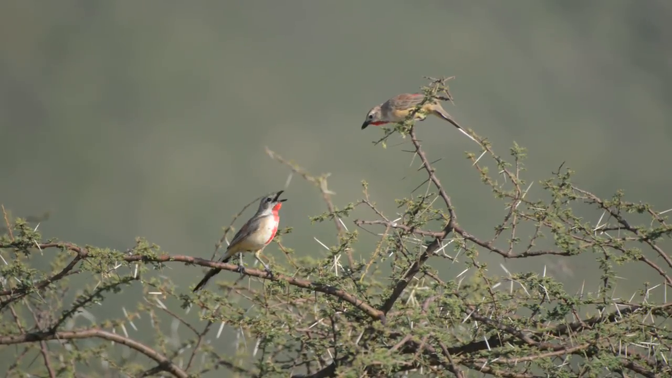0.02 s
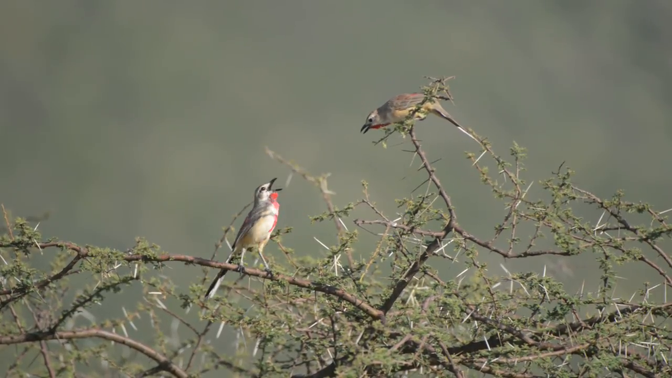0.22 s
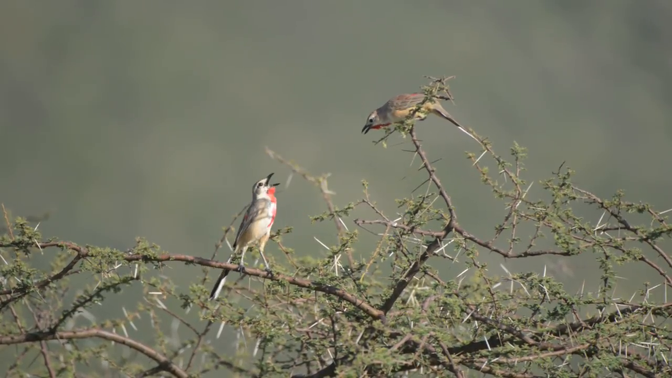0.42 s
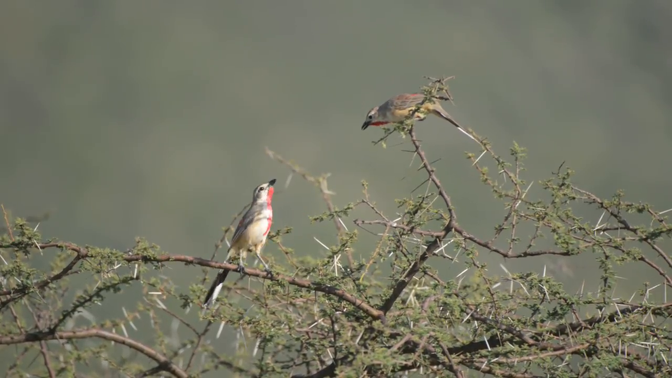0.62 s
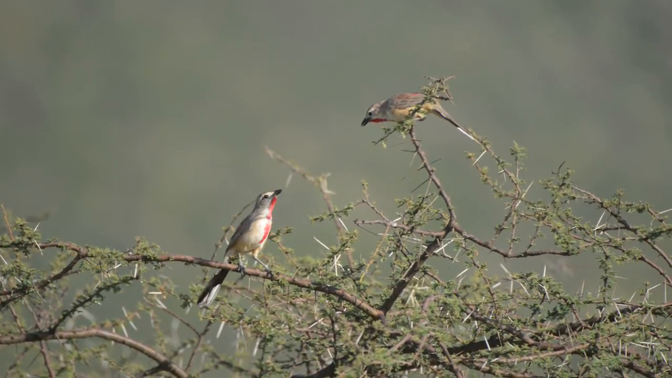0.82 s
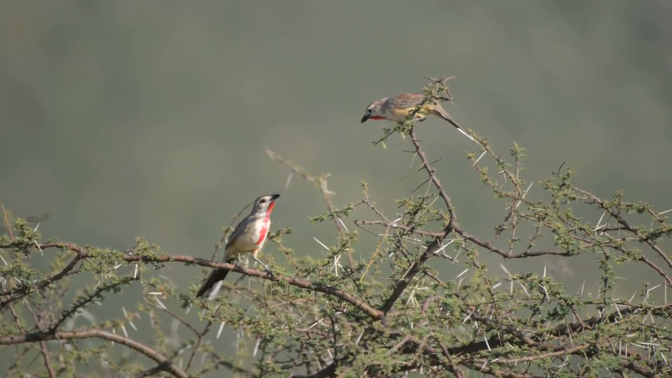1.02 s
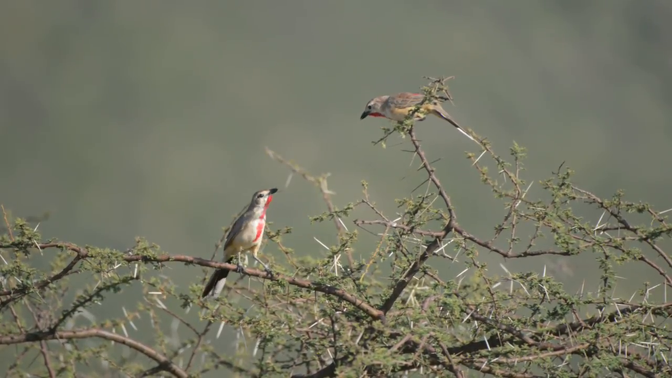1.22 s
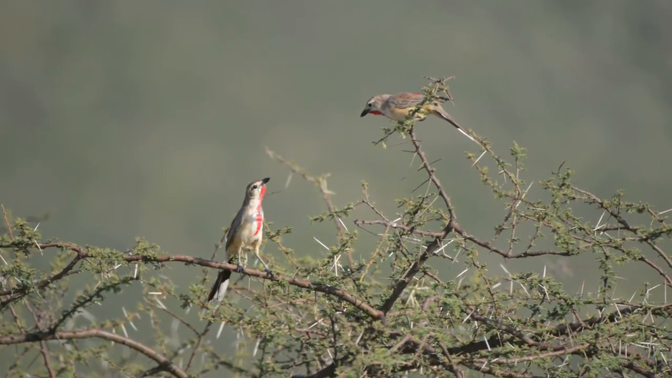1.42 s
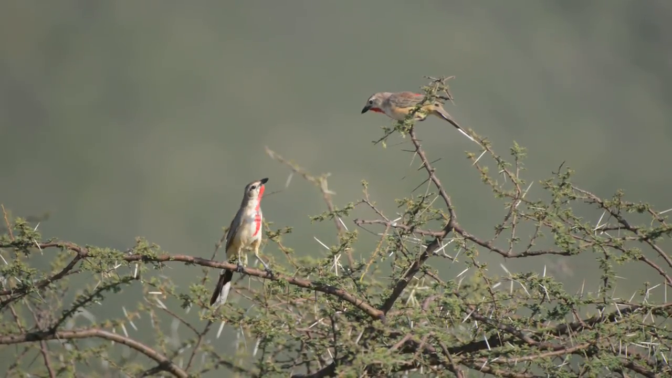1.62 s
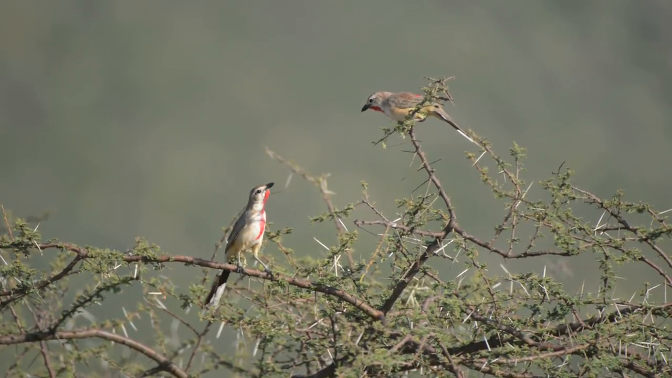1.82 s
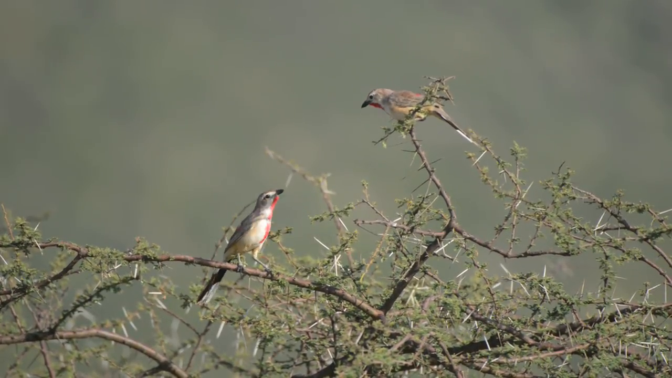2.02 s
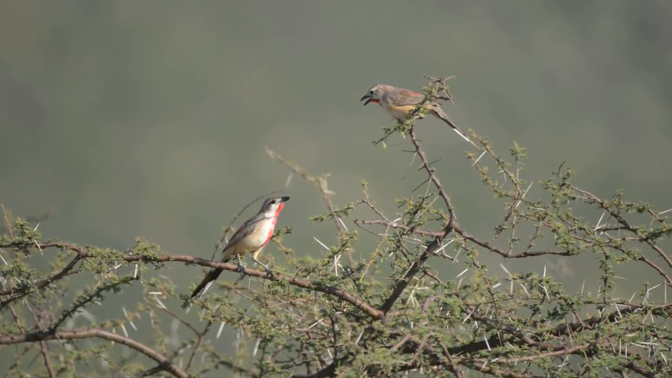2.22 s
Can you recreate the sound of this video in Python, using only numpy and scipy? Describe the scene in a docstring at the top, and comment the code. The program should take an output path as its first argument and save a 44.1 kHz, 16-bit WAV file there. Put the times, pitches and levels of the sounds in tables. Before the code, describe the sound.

A close bird whistles a loud, nearly pure, slowly rising note from 0.16 to 0.5 seconds, then a brief dip until 0.57. Much quieter, a thin high motif repeats from the start to 1.05, then a falling flourish until 1.5. Soft dove coos, low arched pairs, dry early ticks and raspy chucks near 0.75, 1.6 and 1.9 follow over far twittering and steady hiss; faint falling peeps after 2.0.

```python
"""A far chorus twitters over air hiss throughout, with a hoarse low cooing in spells and a few early dry ticks.
A small bird repeats a thin high motif from the start; over it a bush-shrike close by gives one long, slowly
rising whistle and a short dipping note. Doves coo, another bird repeats low arched pairs, a third gives raspy
nasal chucks, and a falling flourish follows the motifs. Voices are gliding sines or harmonics, the rest
shaped noise; diffuse scatter follows the birds."""
import sys
import numpy as np
from scipy import signal
from scipy.fft import rfft, irfft
from scipy.io import wavfile
from scipy.ndimage import uniform_filter1d

SR = 44100
rng = np.random.default_rng(int(sys.argv[2]) if len(sys.argv) > 2 else 0)


def pcm_store(signal):
    """Save signal as 16-bit PCM."""
    levels = np.round(np.clip(np.atleast_2d(signal), -1, 1) * 32767)
    wavfile.write(sys.argv[1], SR, levels.astype(np.int16).T)


def boost(x):
    """Linear amplitude factor 10**(x/20) for a level x in decibels (scalar or array-like)."""
    u = np.asarray(x, float) / 20
    return 10 ** u


N = 101430

# Spectrum of the far chorus, also lent to the rasp of the chucks.
# Each row: frequency in hertz, relative level in dB.
CHORUS_SPECTRUM = [(1200, -26), (2000, -3.5), (4500, 0.5), (7100, -4.5), (9000, -33)]


def unit_rms(x):
    """Normalisation by signal power: scale to rms 1."""
    return x / np.sqrt(np.mean(x ** 2) + 1e-20)


def at_hz(points, hz):
    """Spectral interpolation on a log-frequency axis, with -120 dB outside the points."""
    f, d = np.transpose(points)
    return np.interp(np.log(hz), np.log(f), d, -120, -120)


def drift(rate):
    """Random modulation: normal draws of spread 1, `rate` per second, joined by straight lines."""
    knots = rng.standard_normal(600)
    return np.interp(np.arange(N) / SR * rate, np.arange(600), knots)


def coloured(points):
    """Spectral shaping: white noise weighted in the frequency domain, rms 1."""
    hz = np.arange(N // 2 + 1) * SR / N + 1
    spectrum = rfft(rng.standard_normal(N)) * boost(at_hz(points, hz))
    return unit_rms(irfft(spectrum, N))


def band(x, edges, order):
    """Band-pass filtering between two edge frequencies in hertz."""
    return signal.sosfilt(signal.butter(order, edges, "band", fs=SR, output="sos"), x)


def add(out, s, hz, db, multiple=1):
    """Frequency modulation: phase integrates the pitch points; db is the rms level of the sine."""
    n = np.arange(max(int(s[0] * SR), 0), min(int(s[-1] * SR), N))
    t = n / SR

    def soft(values):
        return uniform_filter1d(np.interp(t, s, values), size=131, mode="nearest")

    edge = np.clip(np.minimum(t - s[0], s[-1] - t) / .003, 0, 1)  # 3 ms fades
    phase = multiple * (2 * np.pi * np.cumsum(soft(hz)) / SR) + rng.uniform(0, 2 * np.pi)
    out[n] += np.sqrt(2) * edge * boost(soft(db)) * np.sin(phase)


def swell(count):
    """Amplitude envelope over the points of a note: soft at both ends, a little uneven between."""
    return np.r_[-7, np.zeros(count - 2), -7] + rng.normal(0, 1, count)


def glide(out, start, length, from_hz, to_hz, db):
    """Linear frequency sweep that swells and fades."""
    share = np.linspace(0, 1, 5)
    add(out, start + length * share, from_hz + (to_hz - from_hz) * share, db + swell(5))


def air():
    """Broadband hiss: stationary noise with a sloping spectrum."""
    # Spectrum of the air hiss. Each row: frequency in hertz, relative level in dB.
    air_spectrum = [(18, -1.5), (142, 3.5), (900, -2.5), (4300, -3), (9200, -15), (16000, -21)]
    return boost(-51.5) * coloured(air_spectrum)


def chorus():
    """Superposition of many far birds: random short slides at Poisson times, over a patchy noise blur."""
    # Loudness of the far chorus, ahead of the shares of its two parts.
    # Each row: time in seconds, level in dB.
    chorus_level = [(0, -48.5), (.6, -43.5), (1.53, -50), (1.62, -44.5), (1.8, -49.5), (2.3, -48.5)]
    twitters_per_s, twitter_s, twitter_slide, spread_db = 650, 0.011, 0.3, 9
    twitter_db, wash_db, flicker_db = -3, -5, 3
    twitters, draws = np.zeros(N), rng.random((2500, 5))
    starts = np.cumsum(-np.log(1 - draws[:, 0])) / twitters_per_s
    share = np.array([0, .5, 1])
    for start, (_, pitch, slide, level, length) in zip(starts, draws):
        if start < N / SR:
            hz = 1500 * 5 ** pitch
            db = at_hz(CHORUS_SPECTRUM, hz) + spread_db * level + np.array([-10, 0, -10])
            s = start + twitter_s * (.5 + 2 * length) * share
            add(twitters, s, hz * (1 + twitter_slide * (2 * slide - 1.3) * share), db)
    # birds too far to tell apart: each band flickers partly with the others, partly alone
    blur, edges, shared = coloured(CHORUS_SPECTRUM), np.geomspace(900, 11000, 8), drift(16)
    wash = sum(band(blur, pair, 2) * boost(flicker_db * (shared + drift(23)))
               for pair in zip(edges, edges[1:]))
    s, db = np.transpose(chorus_level)
    loudness = boost(np.interp(np.arange(N) / SR, s, db))
    return loudness * (boost(twitter_db) * unit_rms(twitters) + boost(wash_db) * wash)


def low_coo():
    """Resonance: noise passed twice through a narrow peak, throbbing, in a few spells."""
    # Spells of the hoarse low cooing. Each row: start in seconds, end in seconds.
    coo_spells = [(0, 0.24), (0.979, 1.25), (1.85, 2.2)]
    centre_hz, width_hz, level_db = 835.4, 110, -59   # width of each pass
    b, a = signal.iirpeak(centre_hz, centre_hz / width_hz, SR)
    t = np.arange(N) / SR
    gate = sum(1. * (t >= on) * (t < off) for on, off in coo_spells)
    gate = uniform_filter1d(gate, size=2000, mode="nearest")
    throb = boost(level_db + 1.9 * drift(15))
    once = signal.lfilter(b, a, rng.standard_normal(N))
    return gate * throb * unit_rms(signal.lfilter(b, a, once))


def ticks():
    """Damped oscillation: a short ring with a puff of treble noise, decaying together."""
    # Dry ticks. Each row: start in seconds, level in dB ahead of rise and decay, ring frequency in hertz.
    tick_rows = [(0.109, -39, 7160), (.146, -28.5, 6380), (0.72, -31, 4540)]
    t60_s, rise_s = 0.015, 0.00076
    out, t = np.zeros(N + 2000), np.arange(2000) / SR
    for s, db, hz in tick_rows:
        puff = band(rng.standard_normal(2000), [4000, 8800], 4)
        envelope = boost(db - 60 * t / t60_s) * np.minimum(t / rise_s, 1)
        out[int(s * SR):][:2000] += envelope * (np.sin(2 * np.pi * hz * t) + 0.7 * puff)
    return out[:N]


def coos(out):
    """Frequency modulation: dove coos whose pitch droops ever faster, as time squared."""
    # Dove coos. Each row: start in seconds, length in seconds, top pitch in hertz.
    coo_rows = [(.285, 0.084, 890), (0.587, .15, 1002), (1.575, 0.17, 998)]
    droop, level_db = .2, -57.5
    share = np.linspace(0, 1, 5)
    for start, length, hz in coo_rows:
        add(out, start + length * share, hz * (1 - droop * share ** 2), level_db + swell(5))


def far_glides(out):
    """Frequency sweeps: single far notes and repeated low upslurs."""
    # Single notes. Each row: start in seconds, length in seconds, first and last pitch in hertz, level in dB.
    glide_rows = [(0, 0.092, 4472, 4528, -50.5), (0.654, 0.0099, 3380, 2823, -41),
                  (1.375, 0.059, 2430, 2517, -45), (1.394, 0.091, 2210, 1900, -53.5),
                  (1.408, 0.036, 4100, 3105, -42), (1.524, 0.042, 3170, 3070, -53.5),
                  (0.018, .15, 547.4, 586.4, -61), (.5, 0.19, 565, 561.5, -61),
                  (2.055, 0.038, 6130, 7560, -54)]
    # Low upslurs. Each entry: start in seconds.
    upslur_starts = [.425, .82, 1.091, 1.42, 1.88]
    for row in glide_rows:
        glide(out, *row)
    for start in upslur_starts:
        glide(out, start, .035, 1080, 1298, -56)


def hoarse_notes(out):
    """Frequency sweeps: the carriers of the warbles and of the quick falling peeps."""
    # Warbles. Each row: start in seconds, length in seconds, first and last pitch in hertz, level in dB.
    warble_rows = [(0.546, 0.1, 2234, 1992, -51), (0.698, 0.054, 1617, 1424, -50.5)]
    # Peeps. Each row: start in seconds, first pitch in hertz.
    peep_rows = [(2.026, 5730), (2.142, 5740), (2.261, 4980), (2.272, 7260), (2.283, 3026)]
    peep_s, peep_fall, peep_db = 0.036, .12, -51   # fall is a share of the pitch
    for row in warble_rows:
        glide(out, *row)
    for start, hz in peep_rows:
        glide(out, start, peep_s, hz, hz * (1 - peep_fall), peep_db)


def chucks(out):
    """Formant emphasis: harmonics four to nine peak about one of them, with breathy noise."""
    # Nasal chucks. Each row: start in seconds, length in seconds, level in dB, strongest harmonic in hertz.
    chuck_rows = [(0.74, 0.04, -49.5, 1960), (1.606, 0.03, -48, 1907), (1.643, 0.034, -45, 1969),
                  (1.909, 0.022, -45, 1818), (1.931, 0.017, -46, 2405), (1.95, 0.042, -44, 1903)]
    usual_hz, fall_db, rasp_db = 475, 6, -5   # fall per harmonic above the strongest, twice that below
    rasp, t = coloured(CHORUS_SPECTRUM), np.arange(N) / SR
    share = np.linspace(0, 1, 5)
    for start, length, db, top_hz in chuck_rows:
        top = round(top_hz / usual_hz)
        pitch = top_hz / top * rng.normal(1, 0.012, 5)
        puff = np.interp(t, start + length * np.array([0, .5, 2]), [0, 1, 0])
        out += boost(db + rasp_db) * rasp * puff
        for k in range(4, 10):
            loss = fall_db * max(k - top, 2 * (top - k))
            level = db - loss + swell(5) + rng.normal(0, 2, 5)
            add(out, start + length * share, pitch, level, multiple=k)


def arched_pairs(out):
    """Frequency modulation: a pair of notes, each rising and falling, repeated from a template."""
    # The two notes of a pair. Each row: one note as points of seconds from the start, pitch in hertz.
    arch_rows = [
        [(.005, 1425), (.045, 1640), (.082, 1870), (.108, 1550)],
        [(.16, 1210), (.208, 1530), (.24, 1540), (.268, 1158)],
    ]
    # Repeats of the pair. Each row: start in seconds, level in dB.
    pair_rows = [(0.329, -51.5), (1.176, -52), (2.075, -53.5)]
    for start, level in pair_rows:
        for s, hz in map(np.transpose, arch_rows):
            add(out, start + s, hz, level + swell(len(s)))


def motif_bird(out):
    """Frequency modulation: a high motif repeated with small variations, then a falling flourish."""
    # Motif, an arch then a rise. Each row: seconds from its low turn, pitch in hertz, level in dB.
    motif_points = [(-.04, 6100, -51), (-.021, 7680, -50), (-.011, 7450, -62.5), (-.001, 6330, -44.5),
                    (0.012, 6900, -49.5), (0.034, 7250, -45.5), (0.051, 7150, -63.5)]
    # Repeats of the motif. Each entry: time of the low turn in seconds.
    motif_starts = [.012, .201, .394, .588, .798, .997]
    # Flourish syllables. Each row: level in dB, then points of time in seconds, pitch in hertz.
    flourish_rows = [(-44.5, [(1.124, 5320), (1.137, 7100), (1.146, 7410), (1.167, 5700), (1.18, 6500),
                     (1.226, 7570)]), (-42, [(1.28, 5570), (1.296, 4920), (1.308, 6310), (1.33, 7270)]),
                     (-43.5, [(1.362, 4790), (1.39, 4400), (1.398, 5300), (1.412, 5100), (1.436, 3420)]),
                     (-40.5, [(1.445, 3490), (1.454, 4154), (1.497, 3730)])]
    s, hz, db = np.transpose(motif_points)
    for start in motif_starts:
        add(out, start + s, hz * rng.normal(1, .004), db + rng.normal(0, 1.5, len(s)))
    for level, points in flourish_rows:
        add(out, *np.transpose(points), level + swell(len(points)))


def far_birds():
    """Superposition of clear voices and hoarse ones, the latter amplitude-modulated by fast noise."""
    clear, hoarse = np.zeros((2, N))
    for voice in (coos, far_glides, arched_pairs, motif_bird):
        voice(clear)
    for voice in (hoarse_notes, chucks):
        voice(hoarse)
    tremble = boost(4.5 * drift(180))
    return clear + hoarse * tremble


def bushes(x):
    """Diffuse scattering: convolution with a tail of dying noise that starts after 10 ms."""
    t60_s = .4
    t = np.arange(SR // 2) / SR
    tail = rng.standard_normal(len(t)) * boost(-60 * t / t60_s) * (t > .01)
    return signal.fftconvolve(x, tail / np.sqrt(np.sum(tail ** 2)))[:N]


def shrike():
    """Harmonic series: a nearly pure whistle with faint second, third and fourth harmonics."""
    # Long rising whistle. Each row: time in seconds, pitch in hertz, level of the fundamental in dB.
    whistle = [(.16, 3500, -66), (.188, 3444, -39), (.216, 3478, -29), (.258, 3503, -21),
               (.284, 3532, -24.5), (.303, 3556, -31.5), (.318, 3560, -23), (.36, 3623, -24),
               (.46, 3634, -20), (.494, 3683, -27.5), (.508, 3630, -59)]
    # Short dipping note. Each row: time in seconds, pitch in hertz, level of the fundamental in dB.
    dip_note = [(.52, 3810, -54), (.531, 3734, -28.5), (.54, 3622, -23), (.55, 3565, -28.5),
                (.56, 3670, -33), (0.575, 3560, -53)]
    second_db, third_db, fourth_db = -30.5, -26.5, -42   # relative to the fundamental
    turn_hz, loss_db_per_hz = 3609, 1.1   # the third fades once the pitch passes the turn
    out = np.zeros(N)
    for rows in (whistle, dip_note):
        s, hz, db = np.transpose(rows)
        third = third_db - loss_db_per_hz * np.maximum(hz - turn_hz, 0)
        # the second and fourth weaken faster than the fundamental, and grow faster
        lag = 0.69 * (db - whistle[9][2])
        for k, below in enumerate((0, second_db + lag / 2, third, fourth_db + lag)):
            add(out, s, hz, db + below, multiple=k + 1)
    return out


def scene():
    """Superposition: birds with their scatter, over ticks, low cooing and air."""
    near, far = shrike(), far_birds() + chorus()
    scatter = bushes(boost(-23) * near + boost(-12) * far)
    mix = near + far + scatter + ticks() + low_coo() + air()
    return mix[None]   # one channel


def roll_off(x):
    """The treble ends steeply here."""
    return signal.sosfilt(signal.butter(12, 16230, fs=SR, output="sos"), x)


def record(dry):
    """Signal chain: the finished mix passes through its last stage."""
    return roll_off(dry)


dry = scene()
out = record(dry)
pcm_store(out)
```